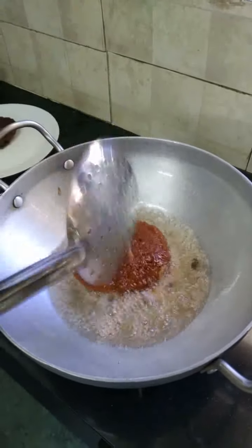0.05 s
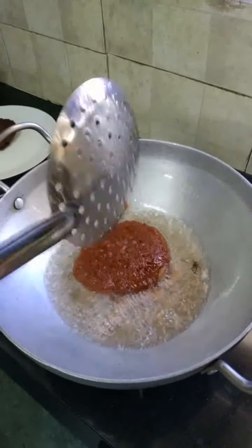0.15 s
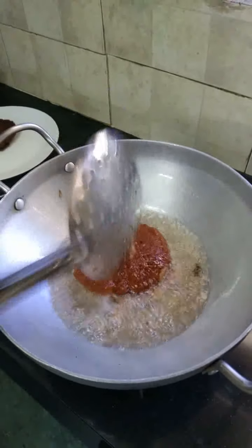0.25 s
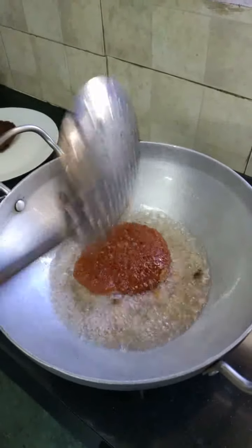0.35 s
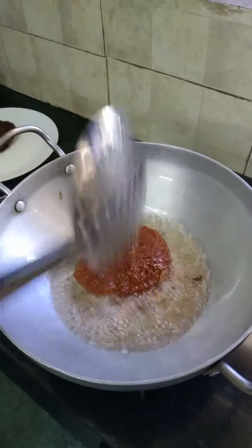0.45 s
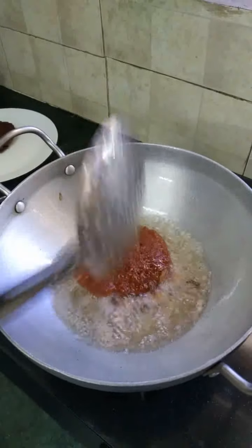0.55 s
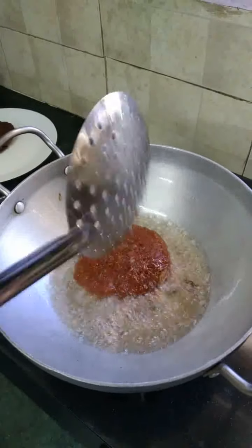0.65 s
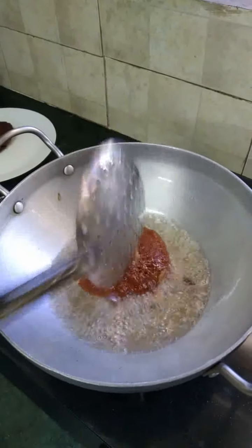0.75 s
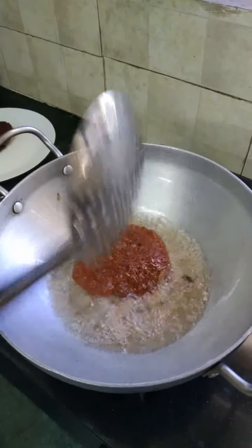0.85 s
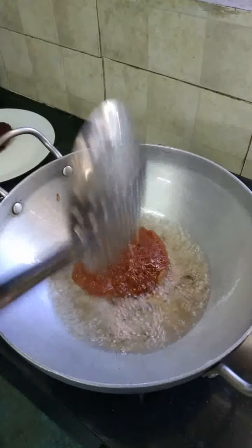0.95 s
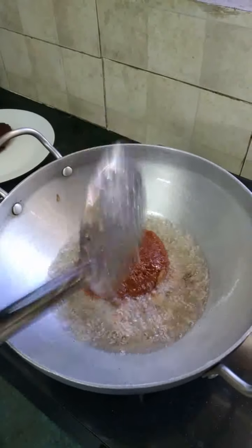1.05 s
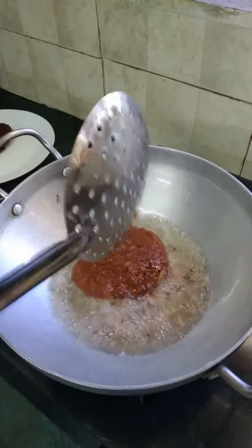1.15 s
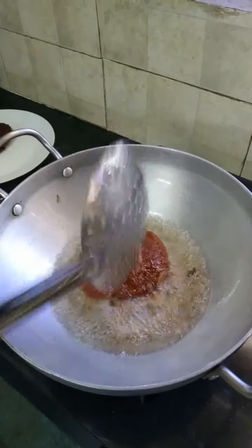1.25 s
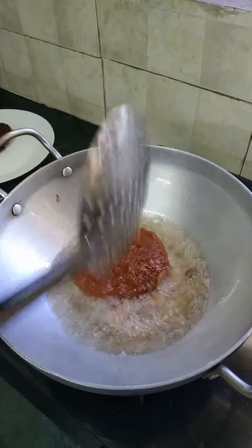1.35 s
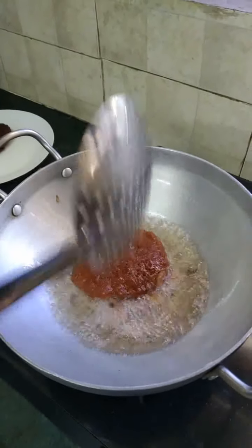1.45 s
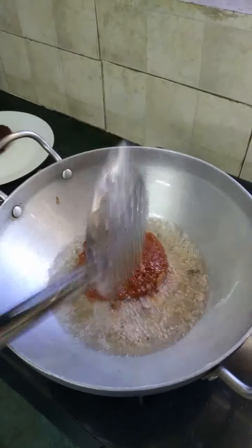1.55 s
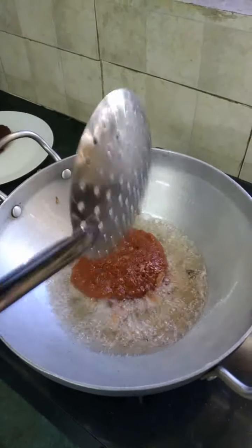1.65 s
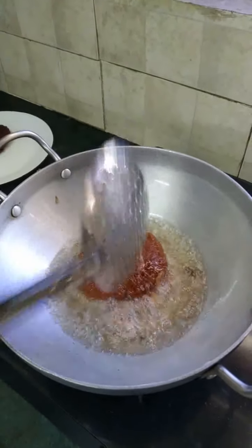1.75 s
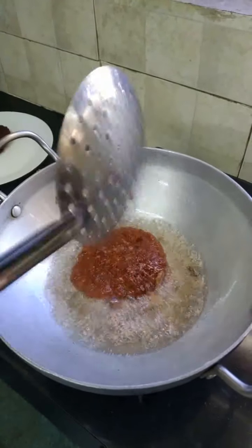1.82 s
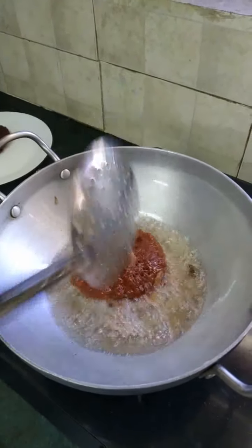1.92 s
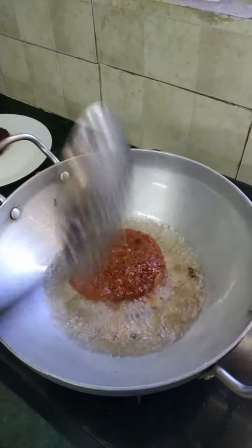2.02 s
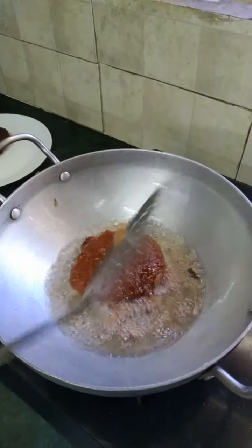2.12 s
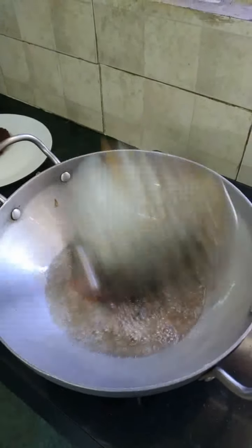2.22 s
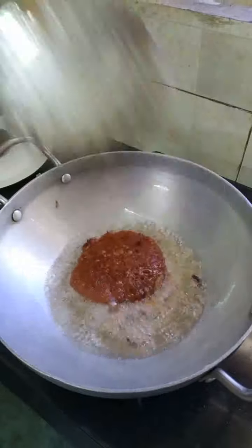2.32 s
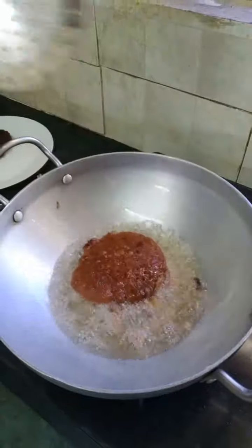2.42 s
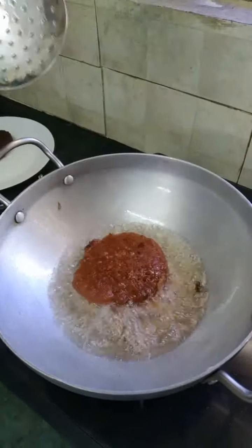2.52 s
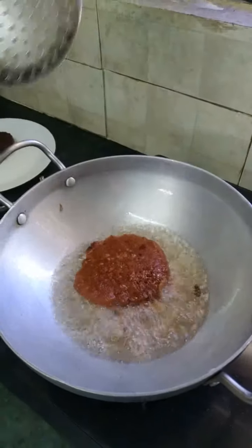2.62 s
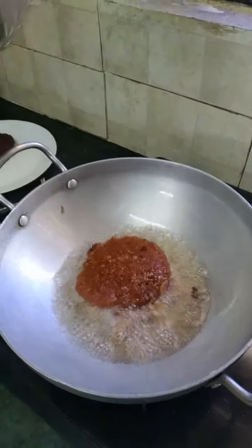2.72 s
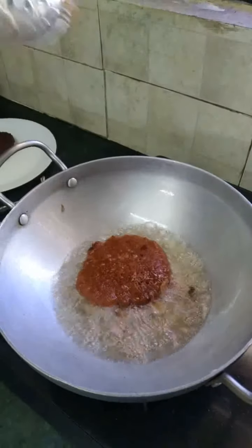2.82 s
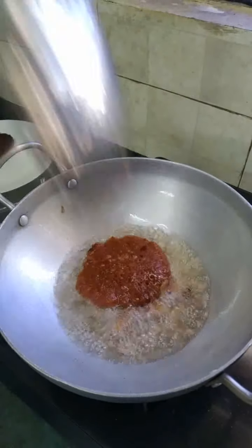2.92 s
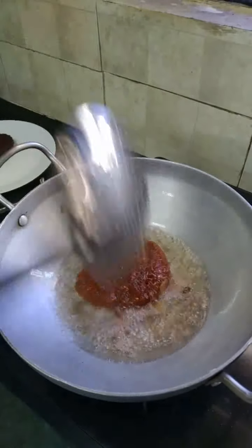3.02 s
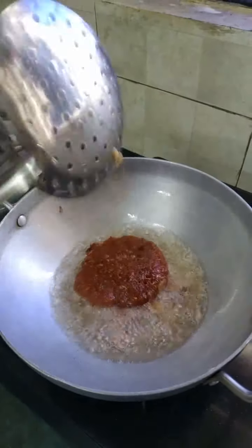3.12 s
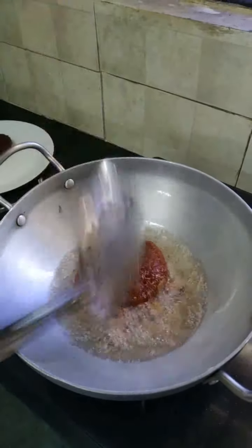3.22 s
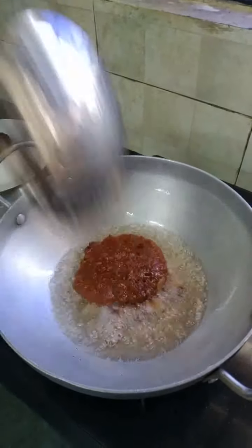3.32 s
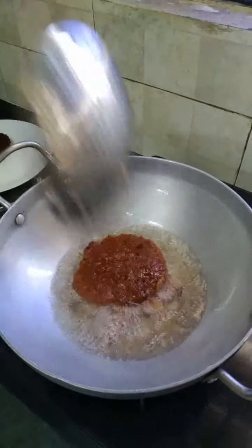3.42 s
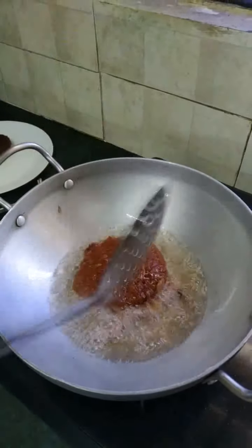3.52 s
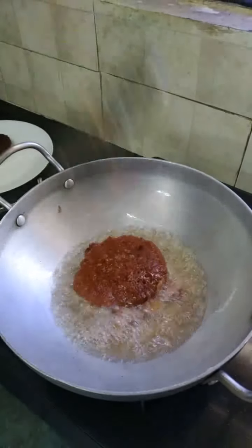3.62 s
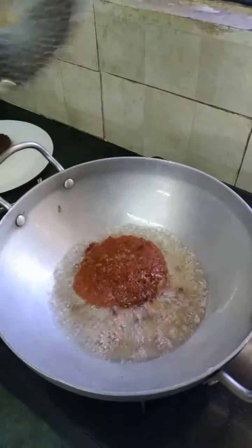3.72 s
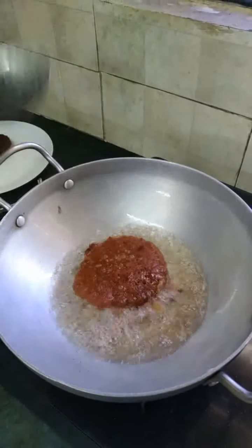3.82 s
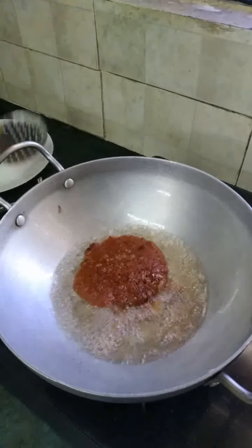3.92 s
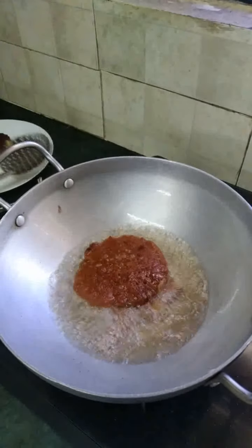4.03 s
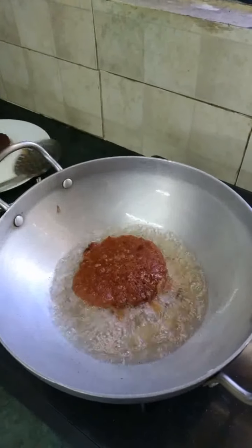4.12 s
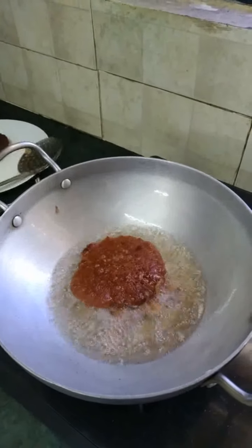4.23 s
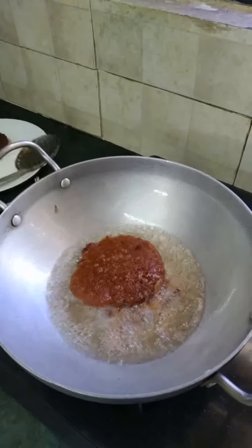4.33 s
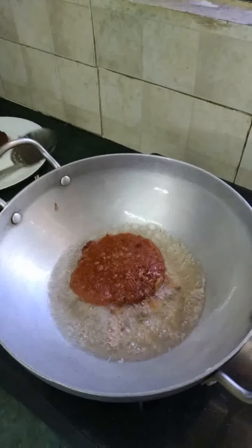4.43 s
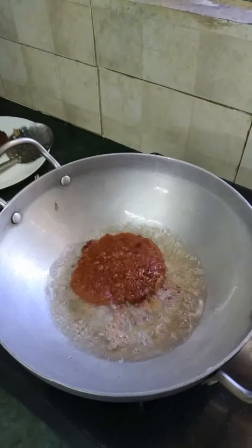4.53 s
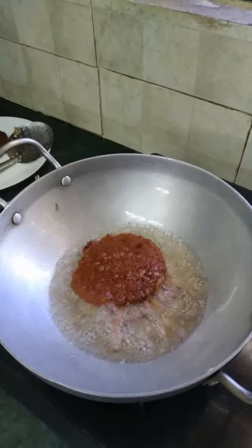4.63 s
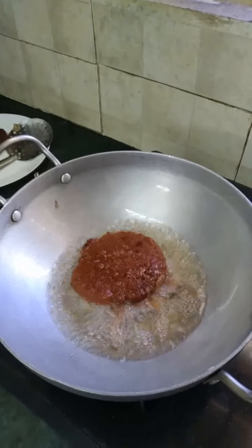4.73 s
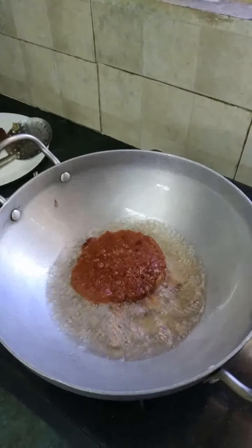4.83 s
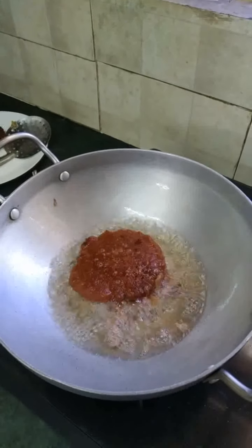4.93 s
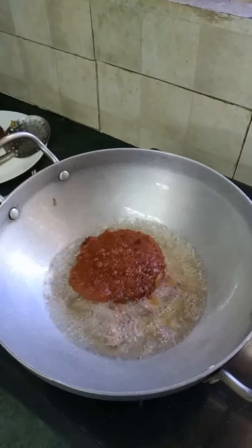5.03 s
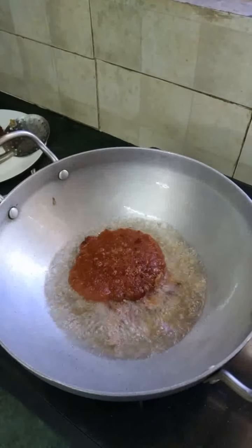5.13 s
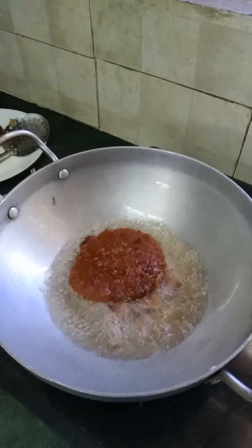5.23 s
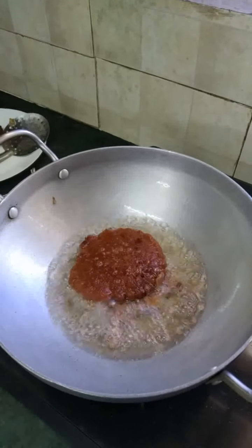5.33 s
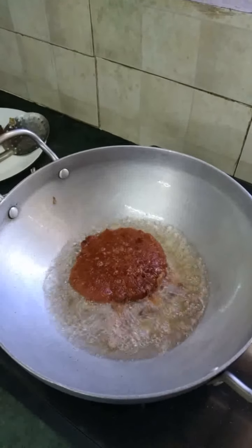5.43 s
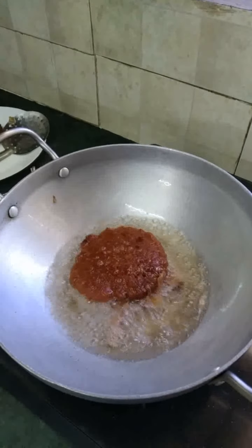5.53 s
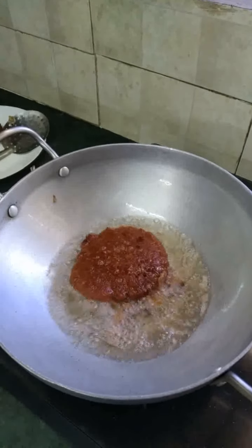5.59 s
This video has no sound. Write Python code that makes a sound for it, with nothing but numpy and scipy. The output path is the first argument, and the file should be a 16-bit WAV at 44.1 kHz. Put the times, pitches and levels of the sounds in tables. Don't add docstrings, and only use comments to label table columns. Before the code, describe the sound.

Batter fries in hot oil with bright fizz and scattered popping bubbles, then a metal skimmer clatters sharply onto a plate.

```python
import sys
import numpy as np
from scipy import signal
from scipy.fft import rfft, irfft, next_fast_len
from scipy.io import wavfile
from scipy.ndimage import uniform_filter1d

SR = 44100
rng = np.random.default_rng(int(sys.argv[2]) if len(sys.argv) > 2 else 0)


def ratio_of_db(decibels):
    return 10 ** (np.asarray(decibels, float) / 20)


def wav_out(sig):
    wavfile.write(sys.argv[1], SR, np.round(np.clip(np.atleast_2d(sig).T, -1, 1) * 32767).astype(np.int16))


N = 249606

# (frequency [Hz], level [dB])
HUM_SPECTRUM = [(24, -53), (40, -55), (59, -2), (180, -8), (222, 0), (270, -1), (372, -8.5), (781, -2.5),
                (1500, -6), (1950, -14), (3300, -120)]
# (frequency [Hz], width [Hz], level [dB])
ROOM_MODES = [(74.9, 4.8, -75), (100.7, 3.8, -77.5), (327, 6.1, -90), (184.9, 9.2, -69),
              (273.3, 8.3, -74.5)]
HUM_DB = -65.5
# (frequency [Hz], t60 [s])
KITCHEN_T60 = [(500, .2), (2000, .19), (5000, .15), (12000, .1)]
# (frequency [Hz], gain [dB])
MIC = [(600, -8.5), (1500, -10.5), (3300, -4), (3700, -8), (4200, -1.55), (5000, -2.5), (6500, -0.5),
       (7600, 1.53), (8300, -9), (9500, -12), (11000, -14), (14500, -21.5), (15800, -25.5)]
# (frequency [Hz], left-right likeness [-1..1])
LIKENESS = [(60, .92), (130, .94), (300, .8), (600, .6), (1200, .4), (1800, -.1), (2400, -.7), (2750, -.93),
            (3750, -.985), (4050, -.6), (4600, -.3), (5500, 0.), (16000, 0.)]
LOW_CUT_HZ = 74.3

# (time [s], fizz level [dB])
FRYING = [(0, -44.5), (.47, -46.5), (1.02, -47.5), (2.11, -50.5), (2.52, -50.5), (2.8, -53), (3.5, -50.5),
          (3.75, -55), (4.43, -52.5), (4.79, -46.5), (4.95, -51), (5.3, -53.5), (5.66, -54)]
FIZZ_PAN_DB = 1.4
SPITS_PER_S, SPIT_FADE_S, SPIT_DB = 45, .012, 2.5
# (time [s], length [s], level [dB], dullness [dB])
SPLASHES = [(0.038, 0.062, -43.5, 3.5), (0.5, 0.051, -41, 1.5), (1.267, 0.037, -61.5, 13.5),
            (2.224, 0.031, -53.5, 13), (2.297, 0.05, -43.5, -0.5), (2.728, 0.023, -45, 2),
            (2.873, 0.031, -46, 3.5), (3.248, 0.027, -38.5, -5), (3.627, 0.041, -36.5, -5),
            (5.168, 0.024, -45, 5.5), (0., 0.025, -36, -9.5), (2.133, 0.023, -47, 12),
            (5.033, 0.029, -47.5, 0), (5.498, 0.012, -49.5, 1), (1.487, 0.054, -47, -1)]

# (start [s], rise [s], hold [s], plate level [dB], fade [dB/s])
RATTLES = [
    (4.2784, 0.00054, 0.069, -36.5, 293),
    (4.403, 0.01, 0.0064, -43.5, 169),
    (4.535, 0.0033, 0.095, -52.5, 110),
    (4.83, 0.024, 0.033, -42, 400),
]
# (steering depth [0-1], plate brightening at 3 kHz [dB],
# ring over plate [dB], plate left-right [dB], ring left-right [dB])
CONTACTS = [
    (1, 3, 4.5, 8, 3),
    (1, -4, 1.5, 0.5, -2),
    (0.97, -1, 3.5, 1.5, 3),
    (0.06, -10, 4, 0.5, -6),
]
# (frequency [Hz], level [dB])
CLATTER_TONE = [(200, -1.5), (400, 7), (700, -1), (1200, 10), (2000, 12.5), (3000, -2), (3600, -8),
                (4200, 1), (5300, -9), (7500, -4), (8400, -24), (11000, -24.5), (15500, -31.5)]
# (frequency [Hz], width [Hz], level [dB])
CLATTER_MODES = [(750, 180, 4.5), (1210, 44, -6), (1570, 30, -7), (2055, 29, 11), (2450, 66, -3),
                 (3100, 56, 1), (4490, 25, 4.5), (5100, 34, 3.5), (5400, 43, 2), (6440, 61, -2),
                 (6400, 39, -21), (7600, 34, -22), (8050, 12, -12), (9590, 41, -14),
                 (328, 40, 1.5), (639, 19, 10), (890, 31, -17), (1110, 30, 8), (2690, 57, 4)]
ONSET_DB, RINGOUT_DB, RINGOUT_DB_PER_S = -9.5, -8, 152
STRIKE_DB, STRIKE_RING_DB, STRIKE_S = 2.5, 9.5, 0.017
THUMP_DB = -67
# (frequency [Hz], level [dB], t60 [s])
CLANG_MODES = [(312, -12, 0.073), (570, -21, 0.047), (690, -3.5, 0.059), (940, -7, 0.06),
               (1056, -10, 0.072), (1221, 1, 0.085), (1307, -3, 0.054), (1463, -7.5, .06),
               (1580, -3, 0.075), (2040, -10, 0.064), (2434, -8, 0.11), (2500, -6.5, 0.073),
               (5340, -3, .07), (6440, -6, 0.055)]
# (time [s], level [dB], brightness [dB/octave], steering depth [0-1])
BOUNCES = [(4.2797, -26, -2, 1.), (4.285, -27.5, 0.5, 1.), (4.2962, -26.5, 1.5, 1), (4.309, -27.5, 6, 0.9),
           (4.319, -29, -2.5, 0.8), (4.329, -33, -8.5, 1.), (4.337, -30, 0.7, 0.9), (4.353, -39, -2, 1.),
           (4.420, -49, 5, 1.), (4.832, -59, -2, .3), (4.848, -58, 1.5, .3), (4.866, -49, 8, .3),
           (4.877, -60, 6, .3), (4.893, -54, -1, .3)]
BOUNCE_SPREAD_DB = 0.5

# (time [s], peak [dB], pitch [Hz], left-right [dB])
LONE = [(0.507, -20.5, 5270, -3), (0.804, -22.5, 6580, -23), (0.9998, -15.5, 4240, 0),
        (1.002, -7.5, 4000, 2), (1.264, -25, 6040, -15), (1.3509, -28.5, 4830, 1), (1.4, -28.5, 3720, 10),
        (1.8146, -29.5, 6800, -5), (1.98, -22.5, 5870, -2), (2.311, -16.5, 6100, -11),
        (2.374, -25, 7400, 6), (2.479, -24.5, 6350, -15), (2.6417, -29.5, 7420, -7),
        (2.917, -32.5, 6600, -4), (3.1616, -34, 5200, -12), (3.3408, -34, 3930, 2), (3.516, -31, 5720, -11),
        (4.248, -22.5, 4250, -1), (4.257, -23.5, 4660, -17), (4.2616, -40, 4370, 1), (4.599, -24, 7140, -5),
        (4.7048, -14, 6540, 16), (5.1675, -19, 5720, -20)]
LONE_Q, LONE_CRACK_DB = 10.84, -16
SAG = 0.041
# (time [s], peak [dB], middle pitch [Hz], left-right [dB])
CLUSTERS = [(0.013, -9.5, 5130, -0.5), (0.276, -37, 5700, -10), (0.5111, -18, 5800, -17),
            (0.538, -28, 6940, 0), (0.5473, -25, 7050, -5), (0.726, -31, 5140, -1), (0.8522, -29, 5300, -4),
            (1.1305, -28, 6000, -1), (1.463, -34, 6280, -1), (1.51, -25, 5100, 5), (1.69, -33, 6700, -2),
            (1.8306, -31, 6100, -1), (1.88, -31, 7100, -5), (2.2344, -37, 4070, -3),
            (2.8868, -25, 5160, -10), (2.931, -31, 5400, -3), (3.1248, -34.5, 6840, 0),
            (3.2508, -19.5, 5020, -19), (3.266, -22, 5050, -21), (3.528, -34, 7300, 1),
            (3.5545, -38, 6130, -3), (3.7135, -33, 4490, 3), (3.9786, -34.5, 5540, -10),
            (4.7031, -15.5, 6180, -22), (2.882, -34, 7500, -5)]
CLUSTER_WIDTH_HZ, CLUSTER_CRACK_DB = 1380, -23
# (time [s], peak [dB], pitch [Hz], width [Hz], left-right [dB])
SNAPS = [(0.6244, -25, 7750, 890, -3), (0.6844, -20, 4220, 395, 9), (0.876, -24, 4600, 431, -2),
         (1.27, -21.5, 4730, 1620, -27), (1.3462, -20.5, 6500, 1300, -6), (2.4792, -45, 9000, 3000, -10),
         (2.1305, -36.5, 3000, 2500, 1), (2.0529, -16.5, 6750, 1010, -34), (2.447, -34, 5400, 2340, -2),
         (2.6157, -32, 6940, 1050, -3), (3.633, -14, 6150, 2780, 1.5), (3.634, -33, 2380, 1800, 4),
         (4.779, -16.5, 5850, 523, -30), (4.9813, -33.5, 6440, 1400, -29), (5.024, -35, 6520, 865, -4),
         (5.083, -33, 5540, 2400, 1), (5.171, -18, 5360, 1570, -2)]
SNAP_CRACK_DB = -6.5
# (time [s], peak [dB], pitch [Hz])
TICKS = [
    (4.2798, -24, 5450),
    (4.2814, -19, 6150),
    (4.2837, -25, 5350),
    (4.292, -21, 4800),
    (4.3393, -23, 6540),
    (4.541, -24.5, 5740),
    (4.833, -27, 5550),
    (4.843, -36, 5200),
    (4.8588, -26, 6200),
    (4.3197, -31, 6100),
]
TICK_WIDTH_HZ, TICK_PAN_DB, TICK_CRACK_DB = 1520, -12, 0.5
# (time [s], peak [dB], pitch [Hz], width [Hz])
KNOCKS = [
    (2.1306, -16.5, 3060, 1110),
    (2.1335, -44, 2450, 870),
    (4.286, -20.5, 1180, 273),
    (4.288, -20.5, 703, 259),
    (4.418, -33.5, 490, 256),
    (2.8877, -20, 3620, 1130),
]
KNOCK_PAN_DB, KNOCK_CRACK_DB = 4.5, -41
# (time [s], peak [dB], pitch [Hz])
FAINT = [(.767, -33, 5800), (.925, -33, 7650), (1.496, -33, 7600), (1.6802, -39, 6560), (1.745, -38, 5650),
         (2.246, -32, 7600), (2.525, -41, 6400), (2.5455, -52, 6500), (2.563, -34, 6100),
         (2.607, -35, 6500), (2.626, -35, 7260), (2.7308, -38, 5530), (3.932, -34, 7000),
         (4.038, -41, 5500), (4.138, -43, 5830), (4.615, -32, 5470), (5.04, -39.5, 5050),
         (5.064, -35, 7000), (5.312, -52, 6470), (5.36, -40, 7000), (5.375, -43, 6460),
         (0.074, -26.5, 6750), (5.5562, -39, 6760), (5.614, -34.5, 7600), (.3207, -41, 7030),
         (1.6651, -45, 6470), (1.8686, -35, 6400), (3.841, -40, 6560), (3.847, -45, 6000),
         (4.001, -39, 6200), (4.008, -39, 5600), (4.048, -40, 6300), (4.082, -48, 6000),
         (4.1743, -39, 7170), (.812, -38, 6500), (0.806, -23, 7000)]
FAINT_WIDTH_HZ, FAINT_PAN_DB = 1100, -10
# (time [s], peak [dB], pitch [Hz], width [Hz],
# left-right [dB])
SIDE_BURSTS = [(1.007, -30, 3800, 380, -5), (1.011, -27, 5300, 500, -3), (1.014, -36, 7000, 3300, -3),
               (1.024, -28, 3700, 410, -3), (2.3178, -20.5, 5300, 1150, -7), (2.234, -43, 1700, 1400, 7),
               (4.839, -31, 8100, 480, -8), (4.851, -30, 5300, 560, -5), (4.858, -33, 6250, 3200, -7),
               (4.8685, -17.5, 5140, 520, -16), (4.872, -25, 4900, 580, -5), (4.878, -29, 5800, 615, -5),
               (4.883, -32, 4800, 695, -5), (4.89, -28, 7600, 895, 2), (4.896, -35, 5400, 1200, -5),
               (4.865, -20, 2860, 760, 14), (4.838, -31, 3000, 540, 14), (4.2812, -21.5, 3200, 404, 14),
               (4.289, -32, 3700, 320, 14), (4.297, -33, 3900, 295, 14), (4.300, -28, 5000, 400, -3),
               (4.306, -28, 5300, 550, -3), (4.314, -29, 5100, 500, -3), (4.302, -21, 1175, 383, 3),
               (4.325, -27, 1950, 600, 3), (4.305, -24, 2060, 600, 3), (4.320, -24, 6200, 770, -3),
               (4.361, -34, 6100, 900, -3), (4.413, -28, 4500, 200, -4), (4.419, -28, 4800, 300, -3),
               (4.425, -31, 5800, 390, -6), (4.441, -27, 5900, 890, -5), (4.833, -27, 6300, 700, -6),
               (4.847, -37, 2900, 600, 14), (4.874, -35, 2900, 670, 14), (2.138, -42, 2700, 1100, 10),
               (2.0573, -29, 6200, 900, -20), (2.066, -32, 7000, 900, -20), (2.243, -38, 5500, 705, -5),
               (2.252, -47, 870, 470, 3),
               (.0065, -24, 6900, 900, -2),
    (.026, -24, 5000, 900, 0),
    (.032, -26, 4420, 600, -2),
    (.039, -28, 4500, 700, -2),
    (1.037, -33, 4050, 500, -3),
    (1.0435, -33, 4200, 500, -3),
    (1.049, -31, 4100, 500, -3),
    (2.870, -34, 6470, 2500, -5),
    (2.753, -37, 6500, 2000, -5),
]


def evened(x):
    return x / np.sqrt(np.mean(x ** 2) + 1e-20)


def read(points, hz):
    f, value = np.transpose(points)
    return np.interp(np.log(hz + 1), np.log(f + 1), value)


def shape(x, gain):
    size = next_fast_len(x.shape[-1] + 2048)
    hz = np.fft.rfftfreq(size, 1 / SR)
    return irfft(rfft(x, size) * gain(hz), size)[..., :x.shape[-1]]


def add(mix, start_s, sound):
    part = mix[:, max(round(start_s * SR), 0):][:, :sound.shape[1]]
    part += sound[:, :part.shape[1]]


def sides(pan_db):
    gain = ratio_of_db(np.array([pan_db / 2, -pan_db / 2]))
    return (gain / np.sqrt((gain ** 2).mean()))[:, None]


def resonate(x, hz, width_hz):
    return shape(x, lambda f: 1 / (1 + 2j * (f - hz) / width_hz))


def clicks(size, per_s, spread_db):
    size_gain = ratio_of_db(spread_db * np.minimum(rng.exponential(1, (2, size)), 4))
    sign = rng.choice([-1., 1.], (2, size))
    return size_gain * sign * (rng.random((2, size)) < per_s / SR)


def steer(x, depth):
    def like(f):
        return np.clip(read(LIKENESS, f) * np.where(f > 2000, depth, 1), -1, 1)
    mid = shape(x[0] + x[1], lambda f: np.sqrt(1 + like(f)) / 2)
    side = shape(x[0] - x[1], lambda f: np.sqrt(1 - like(f)) / 2)
    return np.array([mid + side, mid - side])


def hum():
    noise = rng.standard_normal((2, N))
    modes = sum(ratio_of_db(db) * evened(resonate(noise, hz, width)) for hz, width, db in ROOM_MODES)
    return ratio_of_db(HUM_DB) * evened(shape(noise, lambda f: ratio_of_db(read(HUM_SPECTRUM, f)))) + modes


def kitchen(x):
    taps = np.zeros((2, 16000))
    at = np.arange(60, 15960, 20) + rng.integers(0, 20, (2, 795))
    np.put_along_axis(taps, at, rng.choice([-1., 1.], at.shape), 1)
    hz, t, z = signal.stft(taps, SR, nperseg=128)
    decay = ratio_of_db(-60 * t / read(KITCHEN_T60, hz)[:, None])
    tail = signal.istft(z * decay, SR, nperseg=128)[1]
    tail *= 1 + 1.5 * np.exp(-np.arange(tail.shape[1]) / SR / .01)
    tail /= np.linalg.norm(tail[0])
    crossed = x + 0.43 * x[::-1]
    return x + ratio_of_db(-4.0) * signal.fftconvolve(crossed, tail, axes=1)[:, :N]


def ping(hz, width_hz, turn_rad):
    rise_s = .6 / width_hz
    u = np.arange(round(5 * rise_s * SR)) / SR / rise_s
    phase = 2 * np.pi * hz * rise_s * (u - SAG * (u - 1) ** 2) + turn_rad
    return (u * np.exp(1 - u)) ** 4 * np.array([np.sin(phase), np.cos(phase)]), rise_s


def fizz():
    frames = N // 64 + 8
    a, b = rng.standard_normal((2, 2, 129, frames))
    patches = uniform_filter1d(rng.standard_normal((2, 129, frames)), 30, 2)
    patches = evened(uniform_filter1d(patches, 6, 1))
    spits = rng.exponential(1, frames) * (rng.random(frames) < SPITS_PER_S * 64 / SR)
    fade = np.exp(-np.arange(80) * 64 / SR / SPIT_FADE_S)
    gusts = np.convolve(spits, fade)[:frames]
    treble = np.clip(np.arange(129) * SR / 256 / 3500, 0, 1)[:, None] ** 2
    level_db = 2.2 * patches + SPIT_DB * np.minimum(gusts, 3) * treble
    hiss = signal.istft((a + 1j * b) * ratio_of_db(level_db), nperseg=256, noverlap=192)[1]
    hiss = evened(hiss[:, :N])
    grains = np.zeros((2, N))
    for pitch, width, turn in rng.random((16, 3)):
        grain = ping(3700 + 4100 * pitch, 500 + 1900 * width, 2 * np.pi * turn)[0]
        grains += signal.oaconvolve(clicks(N, 60, 4.4), grain, axes=1)[:, :N]
    s, db = np.transpose(FRYING)
    vigour_db = np.interp(np.arange(N) / SR, s, db)
    return ratio_of_db(vigour_db + 8.5) * sides(FIZZ_PAN_DB) * evened(hiss + ratio_of_db(-7.0) * evened(grains))


def splashes():
    out = np.zeros((2, N))
    t = np.arange(4410) / SR
    for s, length_s, db, dull_db in SPLASHES:
        spit = evened(clicks(4410, 3000, 7.0) + 0.38 * rng.standard_normal((2, 4410)))
        spit = shape(spit, lambda f: ratio_of_db(dull_db / (1 + (f / 3500) ** 4)) * f / (f + 400))
        envelope = np.clip(t / 0.001, 0, 1) * np.clip((length_s - t) / (0.17 * length_s), 0, 1)
        add(out, s, ratio_of_db(db + 6.5) * spit * envelope)
    return out


def rattle_db(t, rise_s, hold_s, fade_db_per_s):
    after = np.maximum(t - rise_s - hold_s, 0)
    onset = ONSET_DB * np.maximum(1 - t / rise_s, 0)
    return onset + np.maximum(-fade_db_per_s * after, RINGOUT_DB - RINGOUT_DB_PER_S * after)


def clatter(start_s, rise_s, hold_s, plate_db, fade_db_per_s,
            depth, bright_db, ring_db, plate_pan_db, ring_pan_db):
    t = np.arange(8000) / SR
    strike = np.exp(-t / STRIKE_S)
    level_db = plate_db + rattle_db(t, rise_s, hold_s, fade_db_per_s) + STRIKE_DB * strike
    ticks = evened(clicks(len(t), 1500, 4.0) + 0.38 * rng.standard_normal((2, len(t))))
    modes = sum(ratio_of_db(db - read(CLATTER_TONE, hz)) * resonate(ticks, hz, width)
                for hz, width, db in CLATTER_MODES)
    sound = shape(ticks + ratio_of_db(7.5) * modes, lambda f: ratio_of_db(read(CLATTER_TONE, f) - read(MIC, f)))
    low = shape(sound, lambda f: 1 / (1 + (f / 3600) ** 8))
    body = evened(shape(low, lambda f: ratio_of_db(bright_db * np.log2(1 + f / 430) / 3))) * sides(plate_pan_db)
    thump = ratio_of_db(THUMP_DB - plate_db) * evened(shape(ticks, lambda f: 1 / (1 + (f / 150) ** 2)))
    plate = ratio_of_db(level_db + 9.5) * (body + thump)
    ring_level_db = level_db + ring_db + STRIKE_RING_DB * strike + 5.0
    ring = ratio_of_db(ring_level_db) * evened(sound - low) * sides(ring_pan_db)
    edges = np.clip(t / 0.00044, 0, 1) * np.clip((t[-1] - t) / .01, 0, 1)
    return start_s, steer((plate + ring) * edges, depth)


def clang(start_s, strike_db, tilt_db, depth, draw):
    t = np.arange(8000) / SR
    ring = np.zeros((2, len(t)))
    for (hz, db, t60_s), (turn, skew, luck) in zip(CLANG_MODES, draw):
        level_db = strike_db + db + tilt_db * np.log2(min(hz, 2500) / 1200) - read(MIC, hz)
        level_db += BOUNCE_SPREAD_DB * (2 * luck - 3.5)
        cycles = hz * t + turn + 0.47 * np.array([[0], [skew]])
        ring += ratio_of_db(level_db - 60 * t / np.clip(t60_s, .03, .3)) * np.sin(2 * np.pi * cycles)
    return start_s, steer(ring * np.minimum(t / 0.0015, 1), np.clip(depth, 0, 1))


def bursts():
    return ([(s, db, hz, hz / LONE_Q, pan, LONE_CRACK_DB) for s, db, hz, pan in LONE]
            + [(s, db, hz, CLUSTER_WIDTH_HZ, pan, CLUSTER_CRACK_DB) for s, db, hz, pan in CLUSTERS]
            + [(*row, SNAP_CRACK_DB) for row in SNAPS]
            + [(*row, TICK_WIDTH_HZ, TICK_PAN_DB, TICK_CRACK_DB) for row in TICKS]
            + [(*row, KNOCK_PAN_DB, KNOCK_CRACK_DB) for row in KNOCKS]
            + [(*row, FAINT_WIDTH_HZ, FAINT_PAN_DB, CLUSTER_CRACK_DB) for row in FAINT]
            + [(*row, CLUSTER_CRACK_DB) for row in SIDE_BURSTS])


def pops():
    pings, cracks = np.zeros((2, N)), np.zeros((2, N))
    crack_fade = np.exp(-np.arange(256) / SR / 0.0012)
    rows = bursts()
    for (s, db, hz, width, pan_db, crack_db), draw in zip(rows, rng.random((len(rows), 6 + 512))):
        gain = ratio_of_db(db) * sides(pan_db)
        spread_hz = max(width - 500, 0)
        for side, turn, lag in zip((0, -1, 1), draw[:3], draw[3:6]):
            part_hz = hz + 0.65 * side * spread_hz
            sound, rise_s = ping(part_hz, np.clip(width, 250, 1100), 2 * np.pi * turn)
            share = min(spread_hz / 1200, 1) if side else 1
            part_s = s - rise_s + abs(side) * .003 * (lag - .3)
            add(pings, part_s, share * gain * sound / ratio_of_db(read(MIC, part_hz)))
        noise = 2 * draw[6:].reshape(2, -1) - 1
        add(cracks, s - .0005, gain * ratio_of_db(crack_db + 13.0) * noise * crack_fade)
    return pings, shape(cracks, lambda f: f ** 3 / (f ** 3 + 2200 ** 3) / (1 + (f / 9000) ** 2))


def scene():
    pings, cracks = pops()
    steel = np.zeros((2, N))
    for rattle, contact in zip(RATTLES, CONTACTS):
        add(steel, *clatter(*rattle, *contact))
    for bounce, draw in zip(BOUNCES, rng.random((len(BOUNCES), len(CLANG_MODES), 3))):
        add(steel, *clang(*bounce, draw))
    oil = steer(kitchen(pings) + fizz(), 0.89) + steer(kitchen(cracks + splashes()), 0.85)
    return shape(oil + steel, lambda f: ratio_of_db(read(MIC, f))) + steer(hum(), 0.98)


def roll_off(x):
    return signal.sosfilt(signal.butter(12, 15600, fs=SR, output="sos"), x)


def record(dry):
    mix = shape(dry, lambda f: 1 / (1 + (LOW_CUT_HZ / (f + 1)) ** 3))
    return roll_off(mix)


dry = scene()
out = record(dry)
wav_out(out)
```